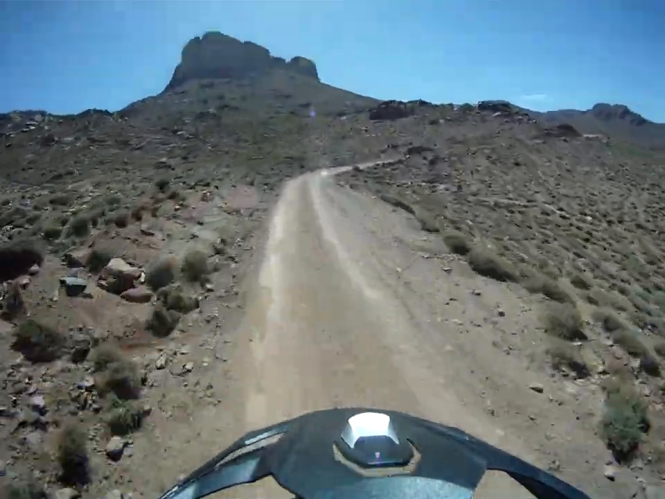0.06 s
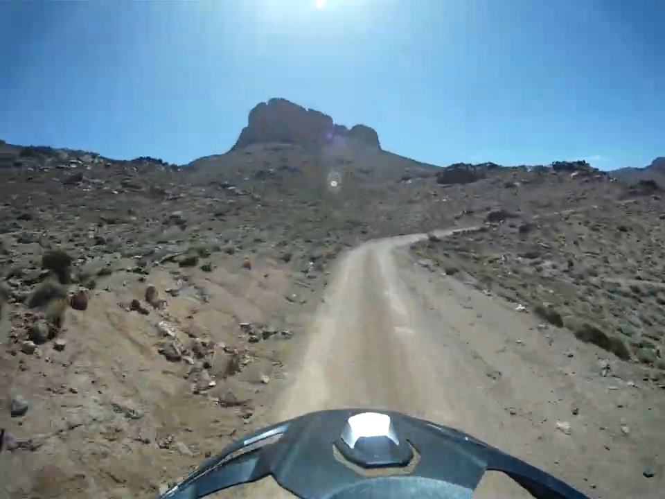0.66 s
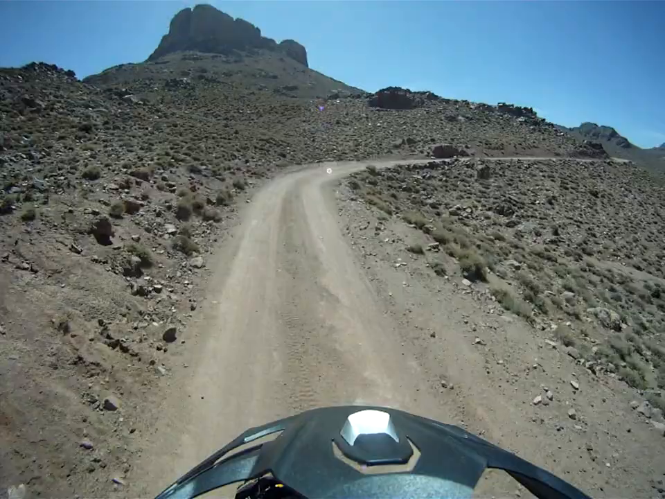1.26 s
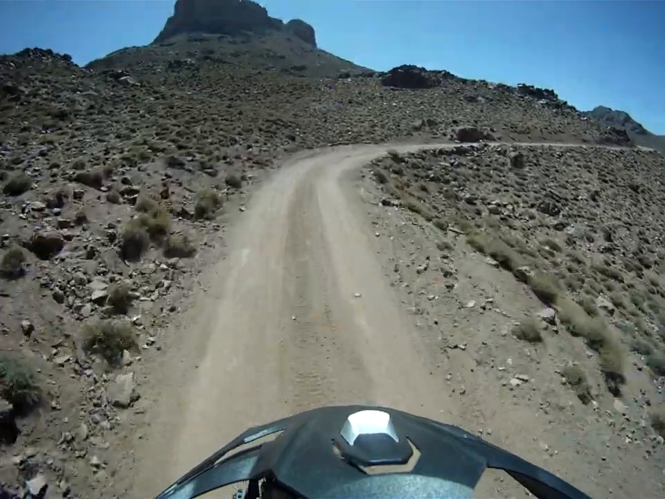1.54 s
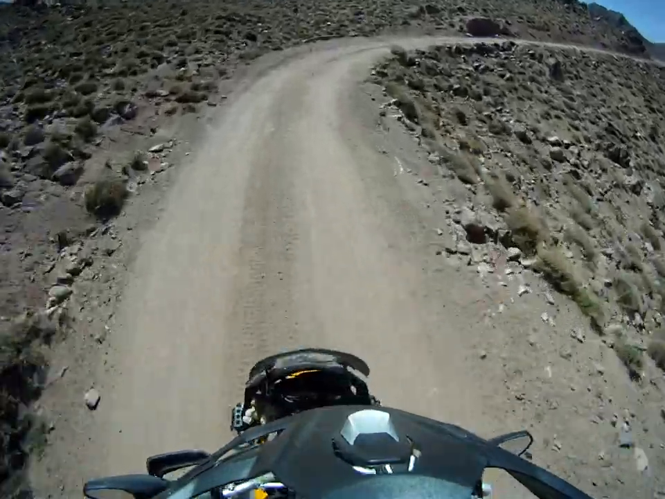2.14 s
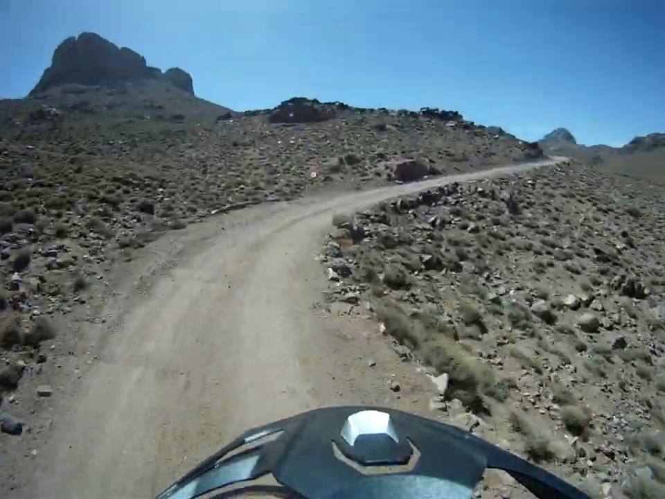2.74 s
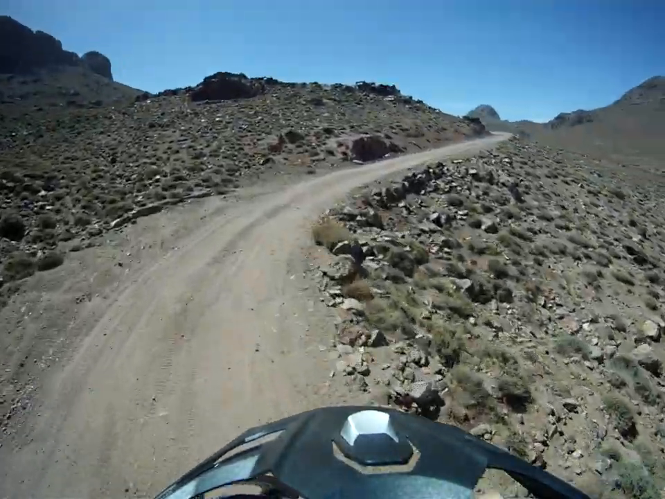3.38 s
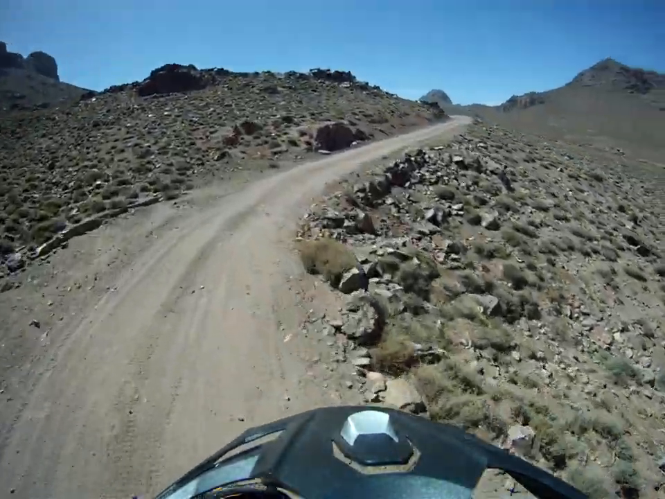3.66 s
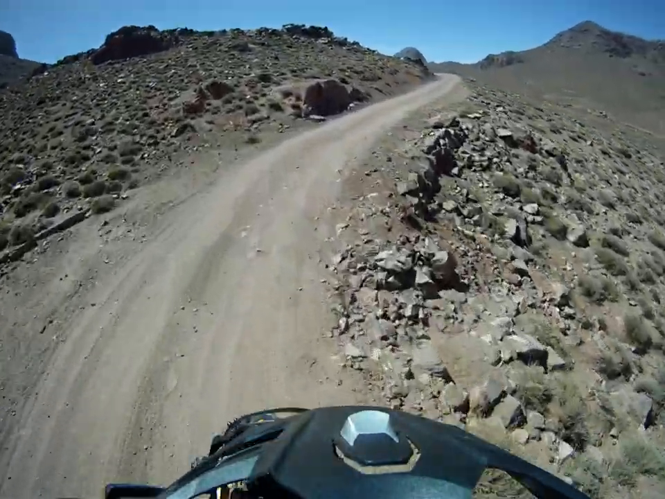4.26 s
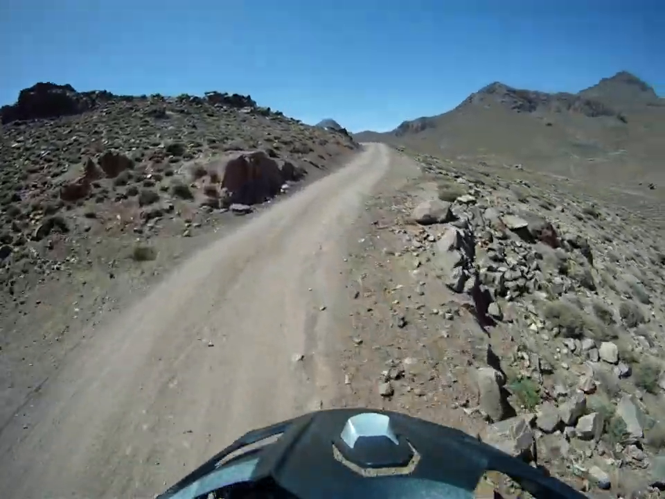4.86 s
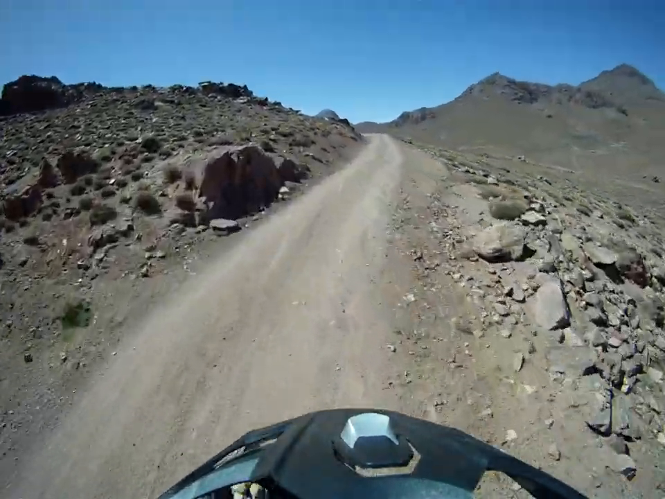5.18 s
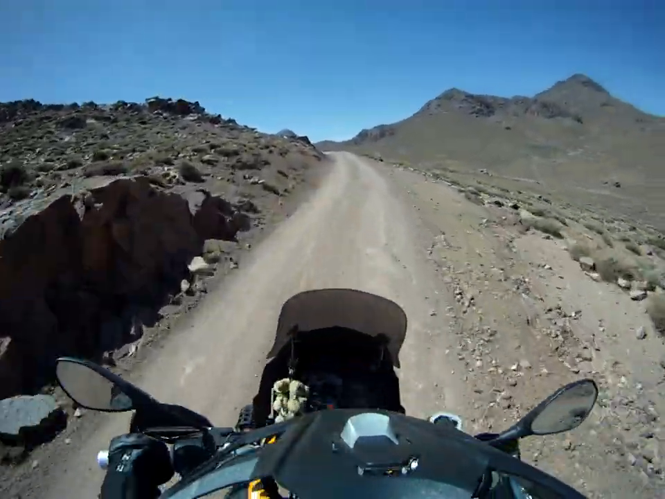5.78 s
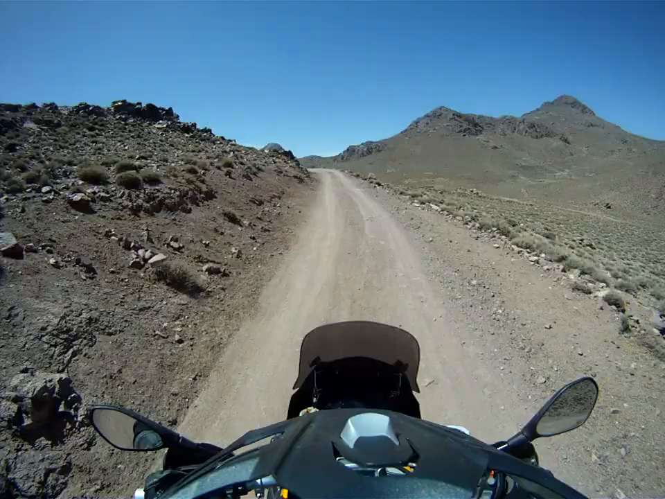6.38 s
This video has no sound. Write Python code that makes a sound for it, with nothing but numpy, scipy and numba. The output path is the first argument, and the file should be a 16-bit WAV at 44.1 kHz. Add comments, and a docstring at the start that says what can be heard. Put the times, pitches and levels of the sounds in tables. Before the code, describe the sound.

A single-cylinder motorcycle rolls off the throttle on a gravel track, heard from a microphone on the rider's helmet. Wind hisses and whistles in gusts, then eases as the engine sinks to a quiet putter. Bumps bring low thumps and sharp plastic knocks, and small stones tick under the tyres. In the last two seconds the engine pulls again, rising in pitch with a metallic clatter as the wind builds.

```python
"""A single-cylinder motorcycle rolls off, coasts and pulls away on gravel, heard by a helmet camera.
Each firing excites the resonances of the exhaust and the metalwork. Wind hisses and whistles round the
camera case, bumps set the helmet booming and the case knocking, and stones tick under the tyres.
The camera ducks after the hardest blows and holds 12000 samples a second, adding a gritty treble."""
import sys
import numpy as np
from scipy import signal
from scipy.fft import rfft, irfft
from scipy.io import wavfile
from scipy.ndimage import uniform_filter1d
from numba import njit

SR = 44100
rng = np.random.default_rng(int(sys.argv[2]) if len(sys.argv) > 2 else 0)


def unload_audio(sound):
    """Save the sound as a 16-bit wav file, at the path given as the first command line argument."""
    columns = np.transpose(np.atleast_2d(sound))
    # keep every value between -1 and 1, then stretch to whole-number steps
    steps = np.round(np.clip(columns, -1, 1) * 32767)
    wavfile.write(sys.argv[1], SR, steps.astype(np.int16))


N = 291942
TIME = np.arange(N) / SR

# airflow past the helmet: time_s, level_db
AIR_LEVELS = [(0, -32.5), (.8, -34), (1.7, -36.5), (1.95, -43), (2.12, -39), (2.25, -46.5), (2.7, -41.5),
              (3.3, -43), (3.5, -50), (4.52, -50.5), (5, -42), (5.8, -44.5), (6.2, -35.5), (6.62, -36)]
# bumps in the track, and at 4.215 s the helmet rebounding from the jolt before: start_s, level_db, rise_s,
# after_ring_db
TRACK_BUMPS = [(0.021, -15.5, 0.0013, -20), (.565, -25.5, 0.0017, -29), (0.788, -27, 0.0017, 2),
               (1.3677, -3.5, 0.0048, -16), (1.504, -9.5, 0.012, -16), (1.733, -16, 0.011, -16),
               (1.852, -4.5, 0.0011, -4), (1.9263, 11.5, 0.0037, -52), (2.664, -0.5, 0.0078, -12),
               (3.091, -19, 0.0086, -12), (3.163, 4, 0.0048, -8), (3.402, -10.5, 0.0046, -8),
               (4.162, -9.5, 0.0059, -13), (4.215, -19, 0.013, 9), (4.629, -5, 0.0016, -14),
               (4.777, -18, 0.015, -35), (5.401, -6, 0.007, -8), (5.521, -17, 0.0098, -33)]
# resonances of a struck pebble: pitch_hz, width_hz, gain_db
PEBBLE_MODES = [(3450, 190, 12.3), (4580, 230, 8.6), (5480, 410, 3.1)]


def engine(cruise_hz=45, wobble=0.0045, scatter_db=1.6, puff_s=0.014, steady_flow=0.2, slap_db=2):
    """Periodic excitation: firings drive exhaust and clatter, both louder with throttle and revs."""
    firing_rates = [(0, 66.8), (.42, 66), (.8, 57), (1.5, 52), (2.1, 44), (3.7, 32), (4.44, 33),
                    (4.77, 37.3), (5.1, 38), (5.44, 42), (5.89, 42.3), (6.13, 48.5), (6.21, 56),
                    (6.35, 64.9), (6.51, 70.2), (6.62, 67.1)]  # engine speed: time_s, firing_hz
    throttle_moves = [(0, 0.69), (.35, 0.3), (.55, 0.13), (4.05, 0), (4.42, 0.5), (4.52, 0.87),
                      (5.62, 0.71), (6.05, 1), (6.38, 1.0), (6.62, .4)]  # the rider's grip: time_s, opening_fraction
    firing_hz, throttle = curve(firing_rates), curve(throttle_moves)
    octaves = np.log2(firing_hz / cruise_hz)
    cycles = np.cumsum(firing_hz * (1 + wobble * drift(30))) / SR
    firing = cycles.astype(int)
    age_s = cycles % 1 / firing_hz
    strength, slap = rng.standard_normal((N // 100, 2))[firing].T  # no two firings are alike
    pulses = np.diff(firing, prepend=0) * undb(scatter_db * strength) / np.sqrt(firing_hz)
    puff = steady_flow + undb(slap_db * slap) * np.exp(-age_s / puff_s)
    exhaust_db = -54.5 + 18.5 * throttle + 7.5 * octaves
    clatter_db = -58.5 + 18.5 * throttle + 13.5 * octaves
    return exhaust(pulses, puff, octaves) * undb(exhaust_db) + clatter(puff) * undb(clatter_db)


def exhaust(pulses, puff, octaves, gas_db=-10, gas_db_per_octave=-8):
    """Pipe resonance: pulses ring the exhaust amid puffs of gas noise; the note clears as revs rise."""
    pipe_modes = [(99, 15.5, -2), (200, 41.3, 4), (247, 79, 1), (344, 47, -9), (453, 100, -11)]  # resonances of the pipe: pitch_hz, width_hz, gain_db
    gas_modes = [(235, 143, 1.5), (366, 36, -16.5), (508, 54, -5), (780, 50, -31)]  # resonances of the gas puff: pitch_hz, width_hz, gain_db
    note = lowpass(resonate(pulses, pipe_modes), 559, order=8)
    gas = lowpass(resonate(puff * rng.standard_normal(N), gas_modes), 620, order=6)
    return unit(note) + undb(gas_db + gas_db_per_octave * octaves) * unit(gas)


def clatter(puff):
    """Forced vibration: a burst of noise at each firing excites the modes of the metalwork."""
    metal_modes = [(870, 35, -22), (1110, 26.4, 3), (1216, 125, 0), (1400, 46, -20), (2087, 130, 0.5),
                   (2270, 82, 4), (3350, 200, -5), (4470, 420, -7.5), (5270, 420, -9)]  # resonances of the engine's metal: pitch_hz, width_hz, gain_db
    metal = resonate(puff * rng.standard_normal(N), metal_modes, sign=0.91)
    return unit(lowpass(highpass(metal, 1026, order=4), 2670))


def rushing_air(flutter_db=1.65):
    """Turbulence: eddies passing the helmet make a broadband rush whose level flutters."""
    air_spectrum = [(120, 2.5), (300, -3.5), (520, -5), (680, -9), (810, 0), (950, -6.5), (1130, 1.5),
                    (1350, 1.5), (1550, 3.5), (1750, 1.5), (2250, 6.5), (2800, -3), (3200, -9.5),
                    (3650, -1.5), (4100, -19.5), (4680, -15.5), (5050, -16.5), (5500, -18), (5950, -26)]  # colour of the rush: frequency_hz, density_db
    return noise(air_spectrum) * undb(curve(AIR_LEVELS) + flutter_db * drift(45))


def helmet_rumble(smooth_db=-37.5, buffet_db=2.5, air_share=0.41, shake_db=-28, shake_fade_s=0.13):
    """Random forcing: buffeting air and the shaking left by each bump add in power as a low rumble."""
    air_db = curve(AIR_LEVELS)
    rumble = noise([(12, -56), (25, -40), (45, 2.5), (56, -2.5), (62, -0.5), (70, 1.5), (85, -22.5),
                    (110, -14), (150, -31.5), (250, -38.5), (900, -88)])
    buffet = undb(smooth_db + air_share * (air_db - air_db.mean()) + buffet_db * drift(7))
    shake = sum(undb(shake_db + 0.99 * db) * (TIME > s) * np.exp(-np.abs(TIME - s) / shake_fade_s)
                for s, db, _, _ in TRACK_BUMPS)
    return rumble * np.hypot(buffet, shake)


def headwind(hoarse_width_hz=460, wander=0.0057, flutter_db=1.5, edge_db=-3, hiss_db=-4):
    """Edge tone: wind whistles on the case, louder, purer and with a smaller share of hiss in gusts."""
    wind_levels = [(0, -32.5), (.8, -32), (1.45, -36.5), (1.68, -43.5), (1.9, -41), (2.05, -90)]  # headwind, dying as the track bends: time_s, level_db
    gusts = [(0.48, 0.17, 8, 323), (0.694, 0.037, 5, 280), (0.913, 0.045, 10.5, 110), (1.036, 0.1, 4, 200)]  # swells on top of it: peak_s, half_length_s, swell_db, whistle_width_hz
    level_db = curve(wind_levels)
    width_hz = np.full(N, float(hoarse_width_hz))
    for peak_s, half_length_s, swell_db, whistle_width_hz in gusts:
        swell = np.exp(-((TIME - peak_s) / half_length_s) ** 2)
        level_db += swell_db * swell
        width_hz *= (whistle_width_hz / hoarse_width_hz) ** swell
    pitch_hz = np.interp(level_db, [-47, -39], [2200, 2453])  # sinks as the wind dies
    hoarseness = np.sqrt(width_hz / width_hz.max())
    eddies = noise([(1000, -42), (2000, 0), (3000, -3), (4200, -12.5)])
    whistle = moving_bandpass(eddies, pitch_hz * (1 + wander * drift(26.4)), width_hz)
    whistle = unit(whistle / hoarseness)  # the band keeps its power as it narrows
    hiss = noise([(700, -30.5), (1300, -28), (1530, -2.5), (1700, -11), (2000, -4), (2450, 0.5),
                  (2700, -7), (2950, -25), (3220, -6), (3650, -14), (4100, -22), (5800, -27.5)])
    wind = undb(edge_db) * whistle + undb(hiss_db) * hoarseness * hiss
    return wind * undb(level_db + flutter_db * drift(109.14))


def helmet_bumps(sway_lead_s=0.0344, sway_db=-11.5, sway_limit_db=-23):
    """Base excitation: the helmet sways as the wheel starts to climb a bump, then booms at the jolt."""
    out = np.zeros(N)
    for start_s, level_db, rise_s, after_ring_db in TRACK_BUMPS:
        if start_s > sway_lead_s:
            sway = helmet_boom(min(level_db + sway_db, sway_limit_db), rise_s=0.011, after_ring_db=-30)
            add(out, start_s - sway_lead_s, sway)
        add(out, start_s, helmet_boom(level_db, rise_s, after_ring_db))
    return out


def helmet_boom(level_db, rise_s, after_ring_db, rest_hz=65.1, relax_s=0.0026, fade_s=0.0078,
                ring_s=0.035):
    """Mass on a stiffening spring: squeezed padding is stiffer, so the boom starts high and sags."""
    t = np.arange(SR // 3) / SR
    squeeze_hz = 48 * undb(0.52 * level_db)  # harder bumps start higher
    pitch_hz = rest_hz + squeeze_hz * np.exp(-t / relax_s)
    onset = 1 - np.exp(-(t / rise_s) ** 2)
    decay = np.exp(-t / fade_s) + undb(after_ring_db) * np.exp(-t / ring_s)
    wave = -onset * decay * np.sin(2 * np.pi * np.cumsum(pitch_hz) / SR)
    return undb(level_db) * wave / np.abs(wave).max()


def case_knocks(tap_lead_s=0.013, tap_db=-18, tap_growth=0.78, shell_cutoff_hz=4500):
    """Backlash: the camera takes up the slack in its case with a light tap, then knocks against it."""
    blows = [(.564, -12.5, -0.5, -3), (1.3672, -5.5, 1, -4.5), (1.851, -18.5, -14, 0.5),
             (1.927, -0.5, -9, 1.5), (2.663, -19, -14, -7), (3.053, -31.5, 14.5, -6),
             (3.078, -27.5, -14, 11), (3.1603, -7.5, -34, 18.5), (3.257, -38, -6, 12),
             (3.402, -27.5, 5, -5), (4.092, -34.5, 6, 9), (4.165, -27.5, 7, -17), (4.628, -8.5, 0, -4.5),
             (4.667, -21, 4, -17), (5.402, -24.5, 0, 3), (5.485, -22, 7, -18), (5.545, -28.5, 9.5, -21)]  # knocks on the case: start_s, level_db, body_db, crack_db
    out = np.zeros(N)
    for start_s, level_db, body_db, crack_db in blows:
        add(out, start_s - tap_lead_s, case_strike(tap_db + tap_growth * level_db, 0, -1))
        add(out, start_s, case_strike(level_db, body_db, crack_db))
    return lowpass(out, shell_cutoff_hz, order=3)


def case_strike(level_db, body_db, crack_db, chatter=0.035, chatter_s=0.0041, build_cycles=3.83):
    """Modal ringing after a chattering contact; body_db weights the low modes, crack_db the high."""
    case_modes = [(231, 11, 0.018), (360, 2, 0.014), (846, -12, 0.04), (1136, 5, 0.015), (1256, 6.5, 0.014),
                  (1448, -3.5, 0.017), (1840, -2.5, 0.019), (2427, 0, 0.012), (3187, -5.5, 0.011),
                  (3710, 1, 0.0058), (4850, -28, 0.012), (5130, -16.5, 0.0096)]  # modes of the case: pitch_hz, level_db, t60_s
    t = np.arange(SR // 12) / SR
    contact = (t == 0) + chatter * rng.standard_normal(len(t)) * np.exp(-t / chatter_s)
    ring = np.zeros(len(t))
    for pitch_hz, mode_db, t60_s in case_modes:
        colour_db = np.interp(pitch_hz, [380, 800, 1570, 2420], [body_db, 0, 0, crack_db])
        onset = 1 - np.exp(-pitch_hz * t / build_cycles)
        decay = np.exp(-np.log(1000) * t / t60_s)
        ring += undb(mode_db + colour_db) * onset * decay * np.sin(2 * np.pi * pitch_hz * t)
    return undb(level_db) * signal.fftconvolve(contact, ring)[:len(t)]


def stones(kick_db=-43.5, kick_scatter_s=0.0051, stray_count=14, bounce_s=0.0069, bounce_db=-13,
           trim_db=-2):
    """Inelastic impact: flung, kicked-up and stray stones click on the bike and rebound more softly."""
    flung = [(3.0684, -38.5), (3.3378, -47), (3.369, -43), (3.5627, -46), (3.6212, -48), (3.8285, -48),
             (4.138, -49), (4.345, -49), (4.611, -39), (4.634, -31.5), (4.768, -41), (4.9297, -46),
             (5.0509, -44), (5.1577, -42.5), (5.8473, -42.5)]  # the larger stones: start_s, relative_db
    kicked = [(s - kick_scatter_s * rng.random(), kick_db + min(db, 0)) for s, db, _, _ in TRACK_BUMPS]
    stray = [(rng.random() * N / SR, rng.normal(-57, 10)) for _ in range(stray_count)]
    out = np.zeros(N)
    for start_s, relative_db in flung + kicked + stray:
        rebound_s = start_s + bounce_s * (0.5 + rng.random())
        add(out, start_s, stone_click(relative_db + trim_db))
        add(out, rebound_s, stone_click(relative_db + trim_db + bounce_db))
    return out


def stone_click(level_db, rise_s=0.0021, fade_s=0.0018):
    """Impact excitation: a brief burst of contact noise rings the pebble's modes."""
    t = np.arange(SR // 25) / SR
    contact = rng.standard_normal(len(t)) * (1 - np.exp(-t / rise_s)) * np.exp(-t / fade_s)
    click = resonate(contact, PEBBLE_MODES)
    return undb(level_db) * click / click[:SR // 200].std()  # level set over the first 5 ms


def tyres(grains_per_s=90, grit_db=-72, roar_db=-63, flutter_db=5.5):
    """Rolling noise: a low uneven roar under a sparse crunch of randomly timed grit impacts."""
    grains = (rng.random(N) < grains_per_s / SR) * rng.standard_normal(N)
    grit = unit(resonate(grains, PEBBLE_MODES))
    roar = noise([(100, -17), (280, -1), (500, -0.5), (850, -7.5), (1300, -16), (4000, -66)])
    return undb(grit_db) * grit + roar * undb(roar_db + flutter_db * drift(24.95))


def undb(db):
    """Decibels to amplitude gain."""
    return 10 ** (np.asarray(db) / 20)


def unit(x):
    """Normalisation to rms 1."""
    return x / np.sqrt(np.mean(x ** 2))


def curve(points):
    """Linear interpolation of (time_s, value) points at every sample."""
    return np.interp(TIME, *np.transpose(points))


def add(track, start_s, sound):
    """Superposition of a sound on the track from start_s."""
    i = max(int(start_s * SR), 0)
    track[i:i + len(sound)] += sound[:N - i]


def drift(rate_hz):
    """Smooth random modulation of rms 1 that changes rate_hz times a second."""
    hold = max(int(SR / rate_hz), 1)
    steps = np.repeat(rng.standard_normal(N)[:N // hold + 1], hold)
    return unit(uniform_filter1d(uniform_filter1d(steps, hold), hold)[:N])


def noise(spectrum):
    """Spectral shaping of white noise by (frequency_hz, density_db) points, at rms 1."""
    hz, db = np.transpose(spectrum)
    bins_hz = np.maximum(np.arange(N // 2 + 1) * SR / N, 1)
    gain = undb(np.interp(np.log(bins_hz), np.log(hz), db))
    return unit(irfft(rfft(rng.standard_normal(N)) * gain, N))


def resonate(x, modes, sign=-1):
    """Parallel resonators; alternating signs fill the valleys between them, like signs hollow them."""
    return sum(sign ** k * undb(db) * signal.lfilter(*signal.iirpeak(hz, hz / width_hz, SR), x)
               for k, (hz, width_hz, db) in enumerate(modes))


def lowpass(x, hz, order=2):
    """Attenuation above hz."""
    return signal.sosfilt(signal.butter(order, hz, fs=SR, output="sos"), x)


def highpass(x, hz, order=2):
    """Attenuation below hz."""
    return signal.sosfilt(signal.butter(order, hz, "high", fs=SR, output="sos"), x)


@njit
def moving_bandpass(x, centre_hz, width_hz):
    """State-variable resonator with a moving centre and bandwidth."""
    y, band_state, low_state = np.empty(len(x)), 0., 0.
    for i in range(len(x)):
        tuning = np.tan(np.pi * centre_hz[i] / SR)
        damping = width_hz[i] / centre_hz[i]
        band = (band_state + tuning * (x[i] - low_state)) / (1 + tuning * (tuning + damping))
        band_state = 2 * band - band_state
        low_state += 2 * tuning * band
        y[i] = damping * band
    return y


@njit
def follow(x, attack_s, release_s):
    """Envelope follower with separate time constants for rising and sinking."""
    y, level = np.empty(len(x)), 0.
    for i in range(len(x)):
        level += (x[i] - level) / (SR * (attack_s if x[i] > level else release_s))
        y[i] = level
    return y


def scene():
    """Superposition of all sources at the camera's one microphone."""
    return (engine() + rushing_air() + helmet_rumble() + headwind()
            + helmet_bumps() + case_knocks() + stones() + tyres())[None]


def record(dry, ceiling=0.28, attack_s=0.0033, release_s=0.11, camera_hz=12000, top_hz=15500):
    """Limiting ducks the sound after hard blows; sample-and-hold mirrors its spectrum into the treble."""
    level = follow(np.abs(dry[0]), attack_s, release_s)
    limited = dry[0] * np.minimum(ceiling / (level + 1e-9), 1)
    stored = np.clip(signal.resample_poly(limited, camera_hz, SR), -1, 1)
    held = signal.resample_poly(np.repeat(stored, 4), SR, 4 * camera_hz)[:N]
    treble_cut = signal.ellip(10, 0.2, 80, top_hz, fs=SR, output="sos")
    return signal.sosfilt(treble_cut, held)[None]


dry = scene()
out = record(dry)
unload_audio(out)
```